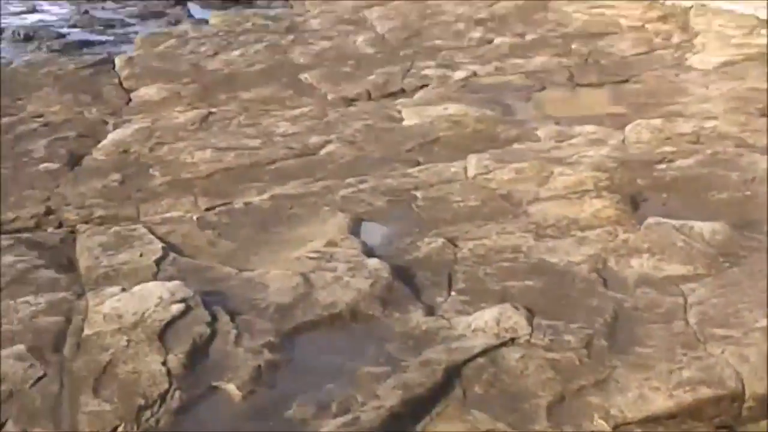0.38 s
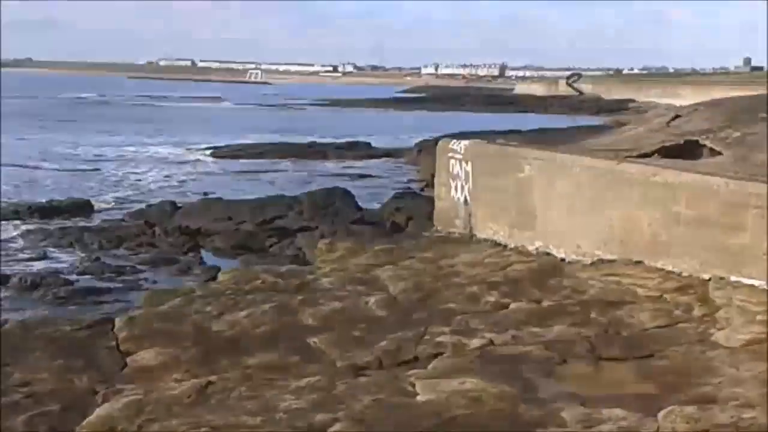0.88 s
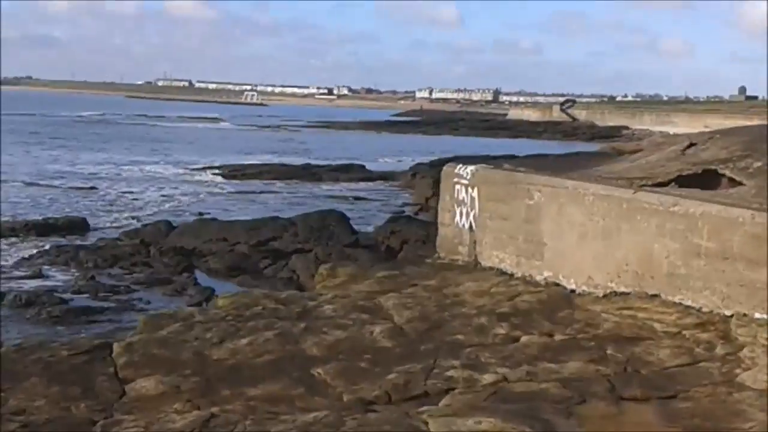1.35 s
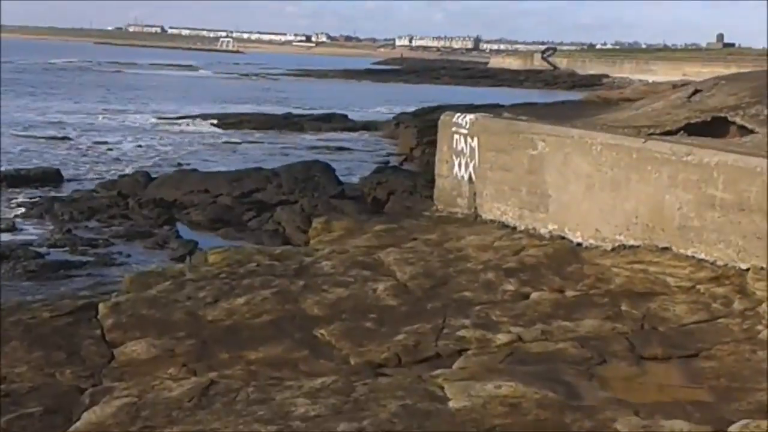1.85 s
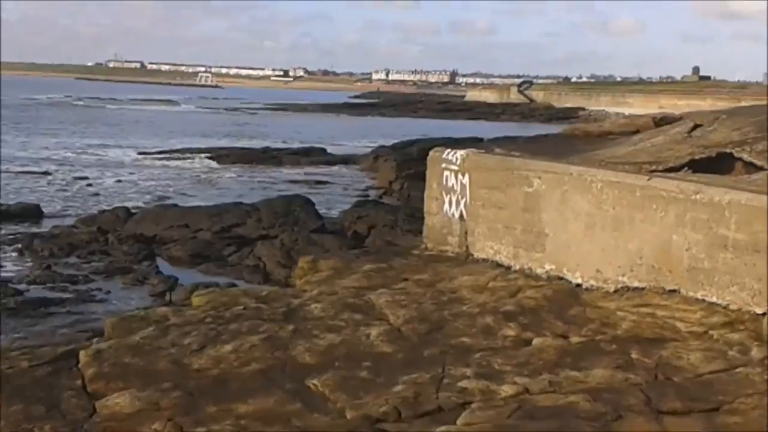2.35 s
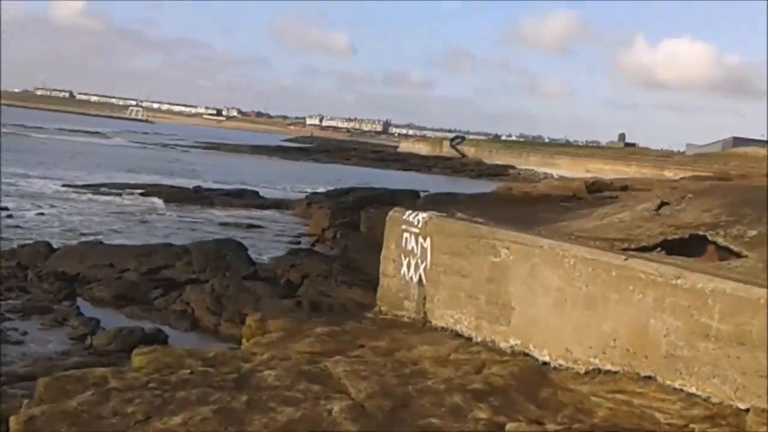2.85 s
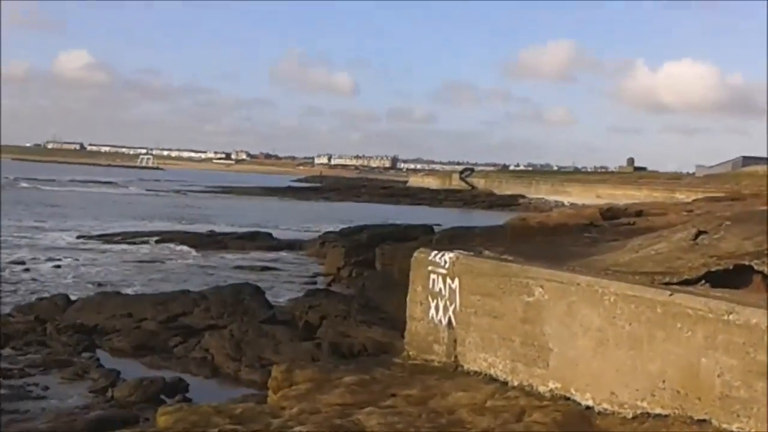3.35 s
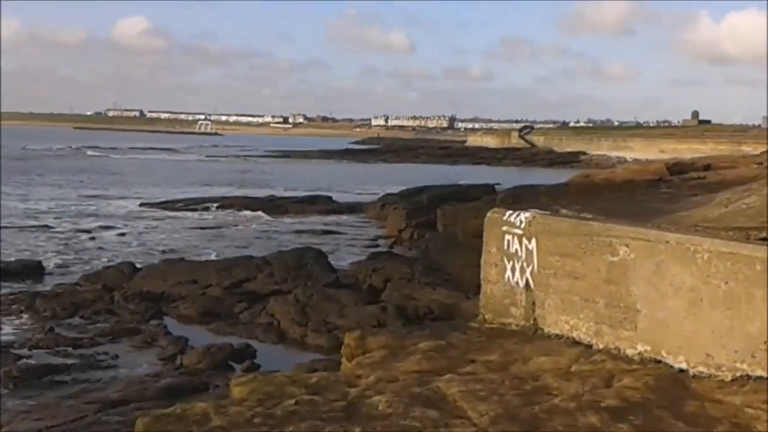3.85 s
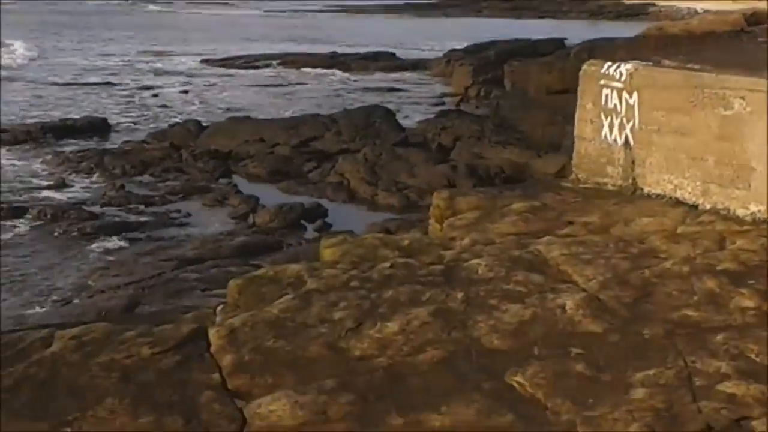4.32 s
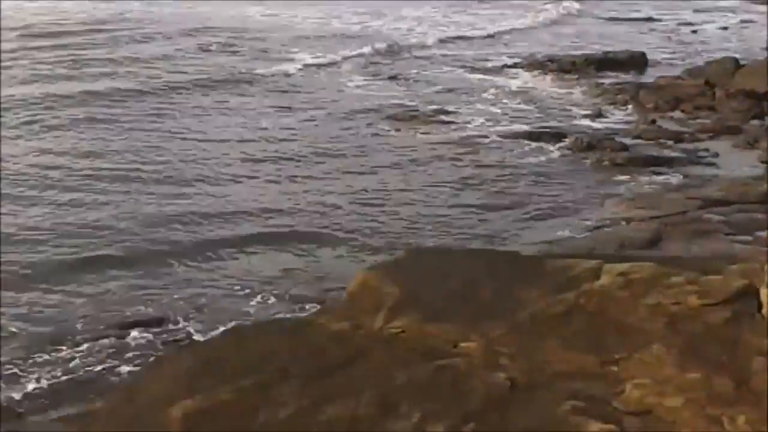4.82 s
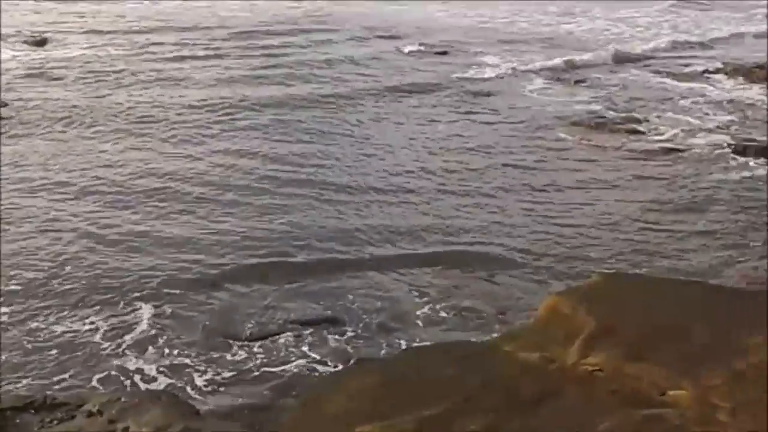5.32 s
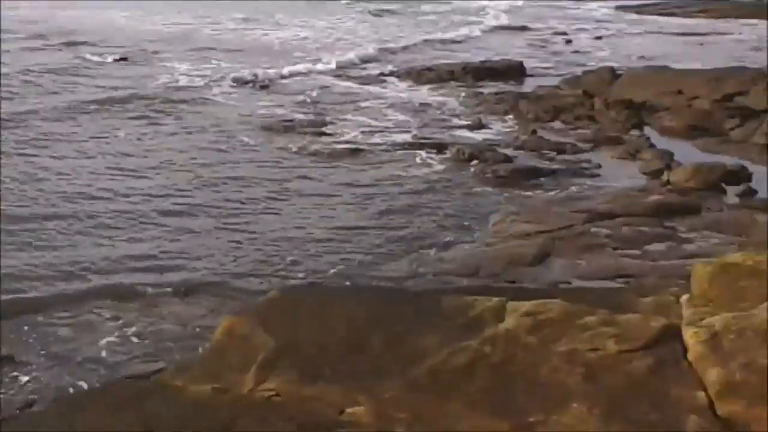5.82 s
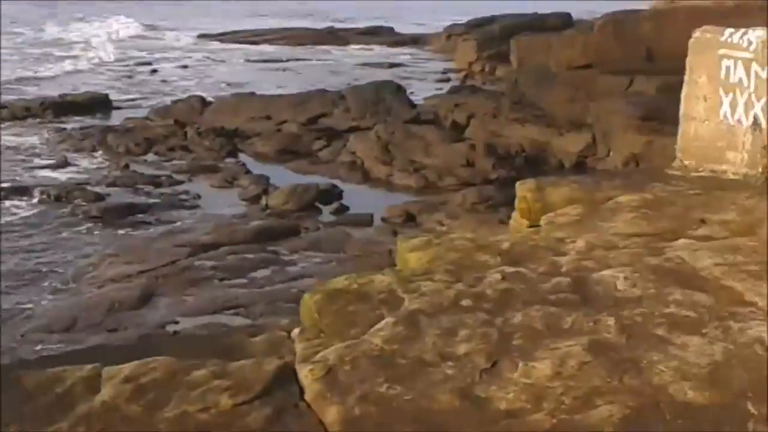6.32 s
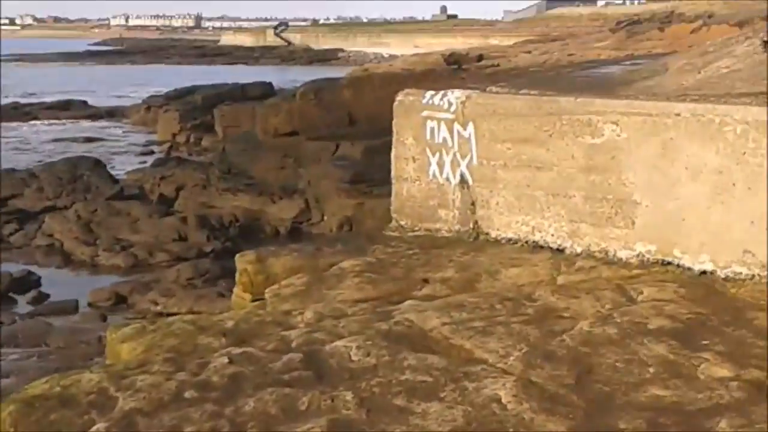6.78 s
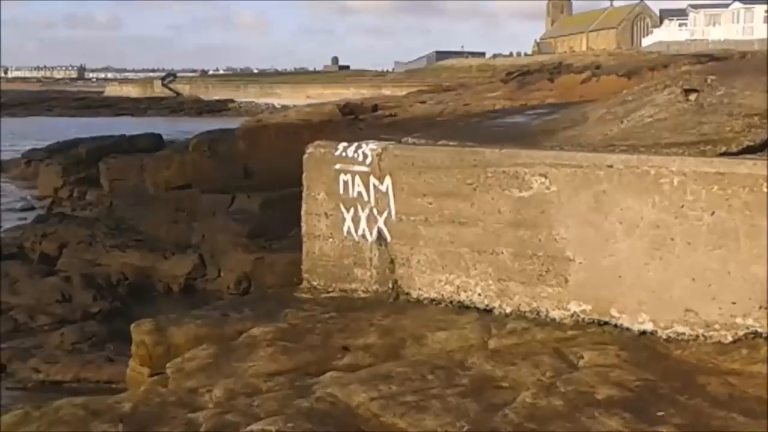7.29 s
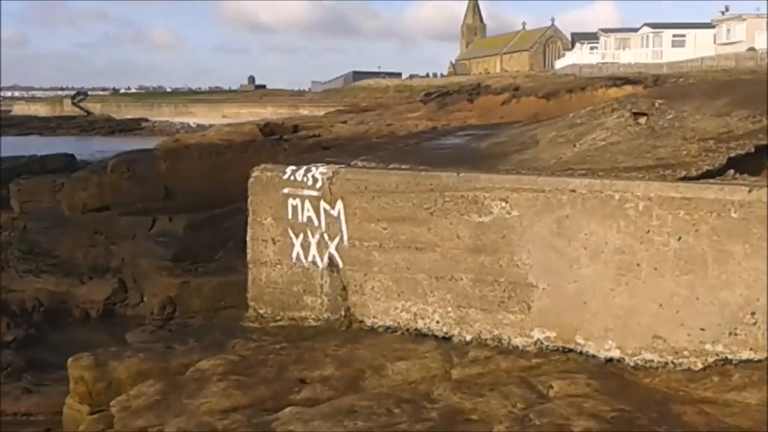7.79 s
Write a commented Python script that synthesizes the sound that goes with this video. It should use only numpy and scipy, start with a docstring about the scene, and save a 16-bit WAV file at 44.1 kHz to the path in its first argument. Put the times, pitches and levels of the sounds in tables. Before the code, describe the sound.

A hand-held camera's small mono microphone picks up unbroken, grainy sea wash with foamy hiss. Short low wind thumps cluster over it, mild at the start, strong and crackling around three to four seconds, then again just after six. Finger ticks tap the housing now and then. Water sounds closer and splashier around five and a half seconds. Thin treble briefly drops out, over very faint hiss and whine.

```python
"""Surf washes over a rocky shore in a steady rush, heard through a small hand-held camera.
The sea is four bands of shaped noise: wash, foam and spray follow one surge, and the near splashing
grows as the microphone faces the water. Gusts shed eddies on the microphone port: short low thumps
in clusters, made of brief swings and noise, and the hardest ones clip. Fingers tap and scuff the housing
now and then, as very short tones that roughen into noise. A faint whine and hiss lie underneath;
the treble drops out for moments."""
import sys
import numpy as np
from scipy import signal
from scipy.fft import rfft, irfft, next_fast_len
from scipy.io import wavfile
from scipy.ndimage import uniform_filter1d, map_coordinates

SR = 44100
rng = np.random.default_rng(int(sys.argv[2]) if len(sys.argv) > 2 else 0)


def level_to_linear(level):
    """Convert decibel levels to linear amplitude factors, elementwise."""
    exponent = np.asarray(level, float) / 20
    return 10 ** exponent


def wav_out(sig):
    """Save sig, one row per channel (or a flat mono array), as 16-bit PCM at SR to the path in sys.argv[1]."""
    wavfile.write(sys.argv[1], SR, np.round(np.clip(np.atleast_2d(sig).T, -1, 1) * 32767).astype(np.int16))


N = 359856  # length in samples


def unit(x):
    """Scale x to an rms strength of 1."""
    return x / np.sqrt(np.mean(np.abs(x) ** 2) + 1e-20)


def curves(rows):
    """Join the points of each column after the time with straight lines, one value per sample."""
    seconds, *columns = np.transpose(rows)
    t = np.arange(N) / SR
    return [np.interp(t, seconds, column) for column in columns]


def wobble(rate):
    """A smooth random curve through `rate` random points a second."""
    points = rng.standard_normal(int(N * rate / SR) + 4)
    return map_coordinates(points, [np.arange(N) * rate / SR])


def coloured(x, spectrum):
    """Filter x by (Hz, dB) points, joined along a logarithmic pitch axis."""
    padded = next_fast_len(N + 8192)
    hz, db = np.transpose(spectrum)
    bins_hz = np.fft.rfftfreq(padded, 1 / SR)
    gain = level_to_linear(np.interp(np.log(bins_hz + 1), np.log(hz + 1), db))
    return irfft(rfft(x, padded) * gain, padded)[:N]


def rush(spectrum, patchy_db, grain_db):
    """Water noise of rms 1, with patches of random gain and a fine bubbly grain."""
    noise = signal.stft(rng.standard_normal(N), nperseg=512)[2]
    # smooth the random gains over neighbouring pitches, then over neighbouring moments
    field = uniform_filter1d(rng.standard_normal(noise.shape), size=6, axis=0)
    field = uniform_filter1d(field, size=10, axis=1)
    patchy = signal.istft(noise * level_to_linear(patchy_db * unit(field)), nperseg=512)[1][:N]
    grain = level_to_linear(grain_db * wobble(700))
    return unit(coloured(patchy * grain, spectrum))


def bursts(rows, carrier):
    """Each row (s, dB, Hz, ms) places carrier(Hz, t, row number) under a bell, ms wide at half height."""
    out = np.zeros(N + SR)
    t = np.arange(-SR // 10, SR // 10) / SR
    for k, (s, db, hz, ms) in enumerate(rows):
        bell = .5 ** ((2000 * t / ms) ** 2)
        start = round(s * SR)
        out[start:start + len(t)] += level_to_linear(db) * bell * carrier(hz, t, k)
    return out[SR // 10:][:N]  # the bell's middle falls on the row's time


def surf():
    """Wash, foam and spray follow one surge; near splashing grows as the microphone faces the water."""
    # Each row: time in seconds, surge in dB over the sea's usual strength,
    # how far the microphone faces the near water from 0 to 1.
    sea = [(0.0, -1.5, .4), (0.75, 1.5, 0), (2.32, -1.5, 0), (3.5, 2, 0.34), (3.82, 5.5, 0), (4.39, 1, .25),
           (5.61, 0, 1), (6.1, 3, 0.7), (6.3, 6, 0.6), (6.5, 2.5, 0.4), (6.84, -.5, .3), (8.16, 1, 0.6)]
    # The tone of each layer of water. Each row: pitch in Hz, relative strength in dB.
    wash_colour = [(30, -49), (70, -43), (150, -8.5), (300, -4.5), (790, -3.5), (930, -5.5), (1860, -4),
                   (2100, -4.5), (2700, -14), (3700, -24.5), (5000, -56), (7000, -77)]
    splash_colour = [(1800, -46), (2500, -2), (3100, -3.5), (3900, -5.5), (4800, -28)]
    foam_colour = [(2500, -29), (3700, -9), (4600, 0), (5500, 2), (6700, -5.5), (8200, -23), (10000, -34)]
    spray_colour = [(4500, -40), (6500, 0), (8000, -2), (10000, -4), (13000, -18), (15800, -16)]
    surge_db, facing = curves(sea)
    # usual level facing away, then what the surge and facing the water add, in dB
    wash_db = -36.5 + 0.66 * surge_db  # far breakers
    splash_db = -57.5 + 11 * facing
    foam_db = -46.5 + surge_db
    spray_db = -65.5 + 1.3 * surge_db + 4 * facing
    # each layer takes its own share of one slow swell
    swell = wobble(3.11)
    wash_db = wash_db + 0.96 * swell
    splash_db = splash_db + 0.5 * swell
    foam_db = foam_db + 0.16 * swell + 0.22 * wobble(17)
    spray_db = spray_db + 0.53 * swell + 0.6 * wobble(11)
    wash = level_to_linear(wash_db) * rush(wash_colour, patchy_db=1.0, grain_db=0.52)
    splash = level_to_linear(splash_db) * rush(splash_colour, patchy_db=1.2, grain_db=1.0)
    foam = level_to_linear(foam_db) * rush(foam_colour, patchy_db=1.8, grain_db=1.0)
    spray = level_to_linear(spray_db) * rush(spray_colour, patchy_db=0.0, grain_db=2.0)
    return wash + splash + foam + spray


def wind():
    """Buffeting and eddies press on the diaphragm, with steep crests, until it runs out of travel."""
    # What the port passes of the turbulence. Each row: pitch in Hz, gain in dB.
    port = [(2200, -0.5), (4000, -6), (8000, -45)]
    gust_db = gusts()
    air = buffeting(gust_db) + eddies(gust_db)
    air = air + 0.42 * air ** 2  # pushes grow steeper than pulls
    travel = 1.1  # the most the diaphragm can move
    moved = air / (1 + np.abs(air / travel) ** 6) ** (1 / 6)
    return coloured(moved, port)


def gusts():
    """Buffeting strength in dB: the strongest puff of the moment, over an unsteady breeze."""
    # Puffs of air on the port. Each row: start of the hold in seconds, hold in seconds, strength in dB.
    puffs = [(0.092, 0.09, -39.5), (0.472, .04, -42), (0.587, .005, -42), (0.65, 0.0092, -35.5),
             (0.8, .03, -36.5), (.95, .03, -45), (1.886, .005, -39), (2.23, .005, -46), (2.497, 0.032, -37),
             (2.603, 0.029, -37), (2.689, 0.18, -37), (2.75, 0.014, -24), (3.008, .005, -43),
             (3.088, 0.26, -31), (3.132, 0.028, -22), (3.42, 0.012, -36), (3.547, .005, -36.5),
             (3.6, 0.014, -21), (3.66, .025, -22.5), (3.826, 0.019, -16.5), (3.937, 0.11, -36.5),
             (4.07, 0.034, -30.5), (4.422, 0.0085, -37.5), (4.551, 0.085, -37), (4.985, 0.032, -40),
             (5.17, 0.058, -37.5), (5.366, 0.14, -37.5), (5.566, 0.011, -42), (5.676, .004, -44),
             (5.75, 0.013, -32.5), (5.853, 0.012, -27), (5.936, 0.038, -41.5), (6.123, 0.26, -29),
             (6.219, .09, -22.5), (6.54, 0.0043, -38), (6.639, .155, -30), (6.819, .05, -28.5),
             (6.883, .04, -40), (3.703, .02, -27.5), (3.878, .015, -28), (3.79, .02, -30),
             (0.654, .12, -49), (5.2, .1, -42), (7.08, 0.13, -36.5), (7.506, 0.19, -39),
             (7.752, .01, -33.5), (7.835, 0.048, -34), (8.01, 0.055, -36), (8.15, .02, -36.5)]
    # The breeze between puffs, before its wobble. Each row: time in seconds, strength in dB.
    breeze = [(0, -49), (.9, -53.5), (1.25, -58), (1.8, -59), (2.4, -53), (4.9, -51.5), (6.5, -52.5),
              (8.16, -44.5)]
    rise_db_per_s, fall_db_per_s = 550, 326
    t = np.arange(N) / SR
    gust_db = curves(breeze)[0] + 3 * wobble(12)
    for s, hold, db in puffs:
        lost_db = np.maximum(rise_db_per_s * (s - t), fall_db_per_s * (t - s - hold))
        gust_db = np.maximum(gust_db, db - np.maximum(lost_db, 0))
    return gust_db


def buffeting(gust_db):
    """Turbulence as noise that comes in lumps some ten ms long, over a deeper rumble."""
    # The tone of the turbulence and of its big slow eddies. Each row: pitch in Hz, relative strength in dB.
    buffet_colour = [(40, -45), (90, -18.5), (150, 4), (260, -1.5), (400, -8), (600, -15.5), (1000, -21),
                     (2000, -50), (4000, -100)]
    rumble_colour = [(15, -30), (30, -14.5), (70, -5), (120, 0), (200, -16), (400, -39)]
    lumps = level_to_linear(6 * np.tanh(.7 * wobble(90) + .25 * wobble(30)))
    flutter = unit(coloured(lumps * rng.standard_normal(N), buffet_colour))
    rumble = unit(coloured(lumps ** .5 * rng.standard_normal(N), rumble_colour))
    # big slow eddies grow less than the small ones as the air speeds up
    return level_to_linear(gust_db + 1.0) * flutter + level_to_linear(0.67 * gust_db - 16) * rumble


def eddies(gust_db):
    """Single eddies: each a short swing of pressure with a torn, noisy edge."""
    # The strongest eddies. Each row: middle in seconds, height of the swing's bell in dB, pitch in Hz.
    strong_eddies = [(0.121, -23, 236), (0.163, -18.5, 280), (0.594, -21.5, 238), (.653, -27, 200),
                     (.8, -24.5, 243), (0.844, -26, 220), (2.681, -17, 406), (2.688, -15.5, 232),
                     (2.722, -17.5, 278), (2.753, -17, 227), (2.795, -17, 340), (2.836, -16.5, 221),
                     (2.998, -15.5, 292), (3.132, -13, 304), (3.139, -8, 305), (3.162, -14.5, 262),
                     (3.187, -17, 317), (3.195, -14, 270), (3.207, -14.5, 307), (3.251, -15.5, 239),
                     (3.29, -20, 213), (3.584, -14, 298), (3.596, -12, 263), (3.607, -8.5, 244),
                     (3.633, -7.5, 348), (3.655, -6, 307), (3.664, -2, 268), (3.685, -11, 302),
                     (3.695, -8, 307), (3.708, -13, 227), (3.791, -10.5, 360), (3.796, -13, 353),
                     (3.816, -12, 426), (3.827, 0.5, 370), (3.8306, 4, 293), (3.84, -4, 374),
                     (3.85, -0.5, 367), (3.866, -13, 302), (3.877, -10, 302), (3.883, -10, 240),
                     (4.075, -19, 228), (4.096, -16.5, 226), (5.182, -22.5, 200), (5.37, -24, 290),
                     (5.406, -22, 190), (5.457, -18.5, 246), (5.492, -17.5, 256), (5.752, -15.5, 240),
                     (5.89, -14, 285), (5.899, -13.5, 258), (6.139, -13.5, 274), (6.146, -14.5, 402),
                     (6.18, -14, 318), (6.215, 0, 310), (6.265, -9, 305), (6.288, -2.5, 245),
                     (6.3, -9, 345), (6.375, -17.5, 270), (6.662, -20, 239), (6.69, -14.5, 202),
                     (6.71, -19, 330), (6.727, -13, 368), (6.747, -12.5, 320), (6.77, -10.5, 376),
                     (6.788, -11, 257), (6.831, -15, 348), (6.85, -13.5, 354), (6.868, -13.5, 286),
                     (7.505, -24, 287), (7.753, -25, 223), (7.859, -22, 270), (8.031, -25, 220),
                     (8.054, -13.5, 370)]
    # The tone of the torn edges. Each row: pitch in Hz, relative strength in dB.
    ragged_colour = [(250, -50), (550, 6), (900, -14.5), (1600, -20), (2600, -17), (4000, -49)]
    cycles = 1.1  # length of a swing
    rows = [(s, db, hz, 1000 * cycles / hz) for s, db, hz in [*lesser_eddies(gust_db), *strong_eddies]]
    # edges lie about 22 dB under their swing and tear more in gusts above -24 dB
    edge_db = -22 + 2 * rng.standard_normal(len(rows))
    gust_then_db = gust_db[[int(row[0] * SR) for row in rows]]
    edge_db += 0.72 * np.maximum(gust_then_db + 24, 0)
    edge_rows = [(s, db + torn_db, hz, 1.18 * ms) for (s, db, hz, ms), torn_db in zip(rows, edge_db)]
    edge_level = bursts(edge_rows, lambda *_: 1)
    edge_noise = unit(coloured(rng.standard_normal(N), ragged_colour))
    return swings(rows, lean=0.54) + edge_level * edge_noise


def lesser_eddies(gust_db):
    """Rows (s, dB, pitch in Hz) of small eddies at random moments, as strong as the air then is."""
    when, size, pitch = rng.random((240, 3)).T
    over_gust_db, ceiling_db = 10, -22
    gust_then_db = gust_db[(when * N).astype(int)]
    db = np.minimum(gust_then_db + over_gust_db, ceiling_db) - 7 * size
    hz = 260 * (.75 + .55 * pitch)
    return np.transpose([when * N / SR, db, hz])


def swings(rows, lean):
    """Short swings of pressure; each is centred on a push, with a random tilt of about lean radians."""
    tilt = lean * rng.standard_normal(len(rows))
    return bursts(rows, lambda hz, t, k: np.cos(2 * np.pi * hz * t + tilt[k]))


def finger_touches():
    """Fingers on the housing: each a short swing whose phase wanders more the rougher the contact."""
    # Each row: middle in seconds, peak in dB, pitch in Hz, length in ms,
    # roughness as the usual random phase step per sample in radians.
    ticks = [(.163, -32.5, 4300, 3.2, 0.3), (.163, -58, 11000, 4, 1.1), (0.1753, -14.5, 1280, .6, 0.11),
             (0.186, -19, 1750, 1, 0), (.748, -47, 13500, 4, .6), (2.6805, -17, 1510, 0.47, 0.04),
             (8.0345, -44, 9000, .5, .3), (8.053, -23.5, 6460, 1.2, 0.5), (3.768, -34, 6960, 1, 0.2),
             (3.785, -44, 7500, 1, .4), (4.86, -33, 5000, 1.5, 0.4), (8.053, -29, 3200, .8, 0.36),
             (8.052, -42, 10200, 8, 1), (8.1, -58, 12300, 70, 1)]
    walk = np.cumsum(rng.standard_normal((len(ticks), SR // 5)), axis=1)

    def touch(hz, t, k):
        roughness = ticks[k][-1]
        return np.cos(2 * np.pi * hz * t + roughness * walk[k])

    return bursts([row[:4] for row in ticks], touch)


def whine():
    """A faint high sine tone whose pitch drifts a little."""
    # One row: pitch in Hz, peak level in dB before the 6 dB added below.
    tone = [(15579, -77)]
    (hz, db), = tone
    drift = np.cumsum(12 * wobble(40)) / SR  # in cycles
    return level_to_linear(db + 6) * np.sin(2 * np.pi * (hz * np.arange(N) / SR + drift))


def amplifier_hiss():
    """The steady hiss of the camera's amplifier: noise that is strongest in the high treble."""
    # Each row: pitch in Hz, relative strength in dB.
    hiss_colour = [(5000, -32), (8000, -8.5), (11000, -0.5), (15300, 1.5), (15600, 1), (15800, -4)]
    return level_to_linear(-66.0) * unit(coloured(rng.standard_normal(N), hiss_colour))


def scene():
    """Sea, wind, finger contacts, whine and hiss added together at one microphone."""
    mix = surf() + wind() + finger_touches() + whine() + amplifier_hiss()
    return mix[None]


def thinned(x, above_hz, keep_db):
    """Keep of the treble only the few spots in pitch and time that stand far over the rest."""
    hz, _, z = signal.stft(x, SR, nperseg=1024)
    usual = np.sqrt(np.mean(np.abs(z[hz > above_hz]) ** 2))
    keep = (hz[:, None] < above_hz) | (np.abs(z) > level_to_linear(keep_db) * usual)
    return signal.istft(z * keep, SR, nperseg=1024)[1][:N]


def band_limit(x):
    """A steep low-pass at the top of the band."""
    return signal.sosfilt(signal.butter(12, 16820, fs=SR, output="sos"), x)


def record(dry):
    """The bass is cut, the input rounds off at full scale, the treble thins out at times and ends sharply."""
    # The microphone's low cut. Each row: pitch in Hz, gain in dB.
    low_cut = [(15, -6), (50, -2.5), (120, 0)]
    # Moments when the treble drops out. Each row: middle in seconds, length in ms with both fades.
    dropouts = [(.337, 27), (.807, 34), (1.35, 45), (1.424, 29), (1.67, 23), (1.746, 26), (1.789, 23),
                (2.129, 23), (2.171, 22), (2.235, 20), (2.471, 26), (2.512, 23), (2.939, 31.4), (3.687, 30),
                (4.092, 38), (4.348, 29), (4.391, 24), (4.924, 29), (5.628, 32), (5.82, 26), (6.159, 36),
                (6.821, 23), (7.015, 26), (7.324, 41), (7.739, 31), (7.953, 25)]
    x = coloured(dry[0], low_cut)
    x = x / (1 + np.abs(x) ** 20) ** (1 / 20)
    t = np.arange(N) / SR
    full = np.ones(N)  # share of the full sound; the rest is the thinned one
    fade_s = .017
    for s, ms in dropouts:
        depth = np.clip((ms / 2000 - np.abs(t - s)) / fade_s, 0, .98)
        full *= np.cos(np.pi / 2 * depth) ** 2
    thin = thinned(x, above_hz=1900, keep_db=10.0)
    mix = thin + full * (x - thin)
    top_hz = 15830
    mix = coloured(mix, [(20, 0), (top_hz, 0), (top_hz + 30, -70)])
    return band_limit(mix)


dry = scene()
out = record(dry)
wav_out(out)
```